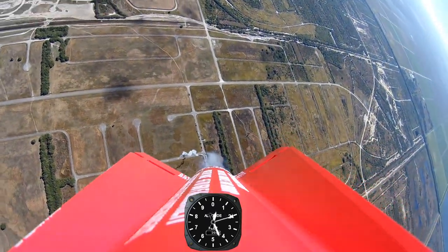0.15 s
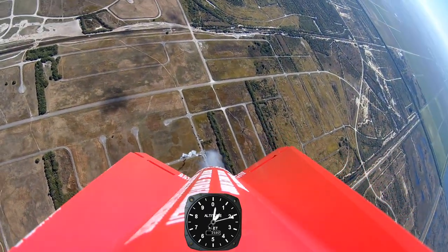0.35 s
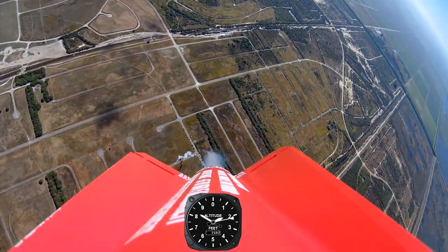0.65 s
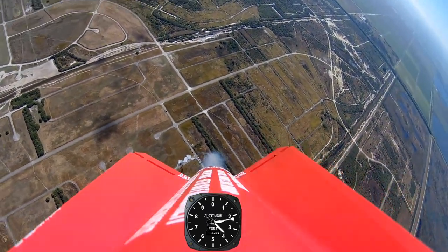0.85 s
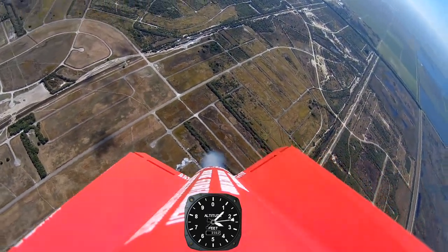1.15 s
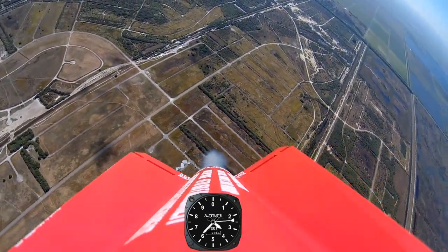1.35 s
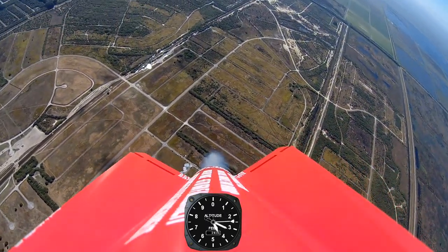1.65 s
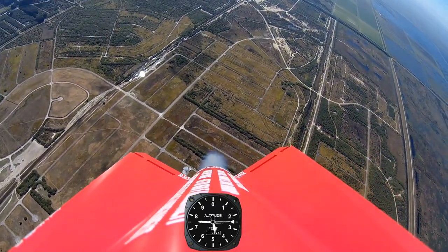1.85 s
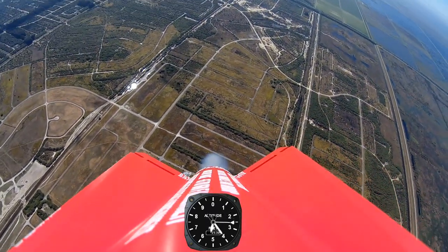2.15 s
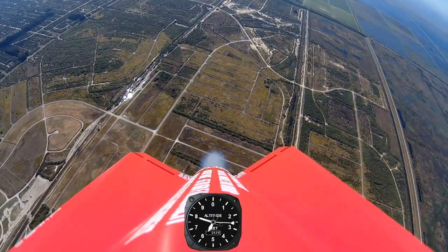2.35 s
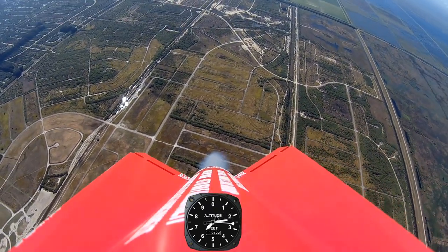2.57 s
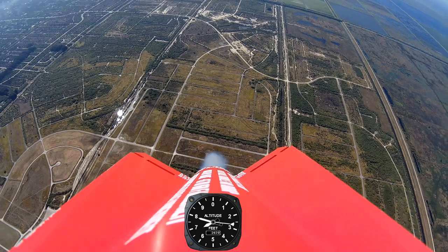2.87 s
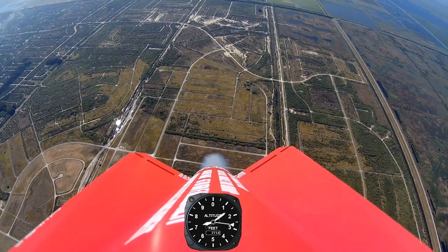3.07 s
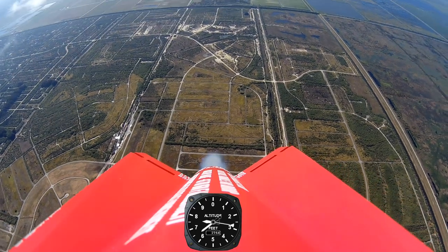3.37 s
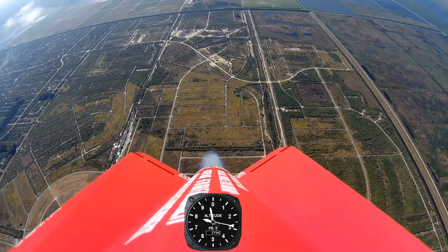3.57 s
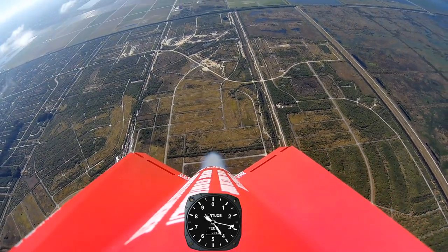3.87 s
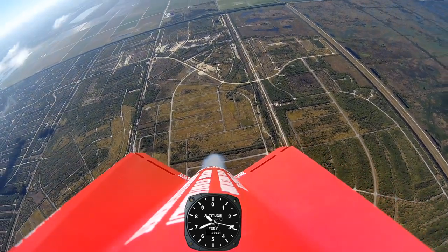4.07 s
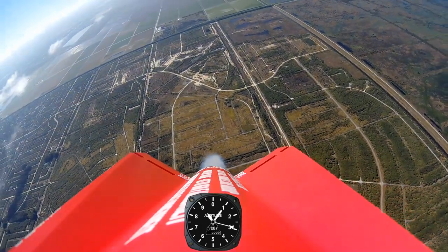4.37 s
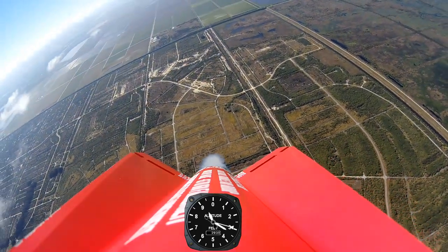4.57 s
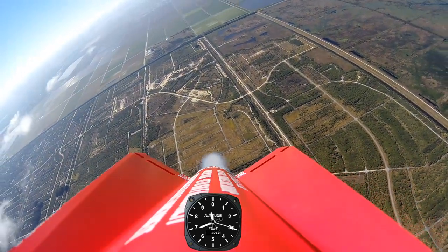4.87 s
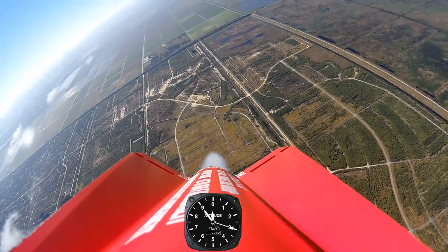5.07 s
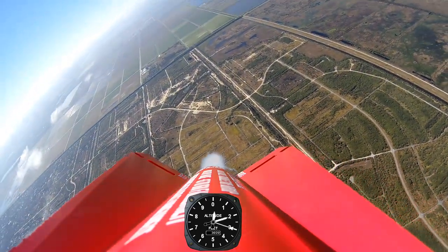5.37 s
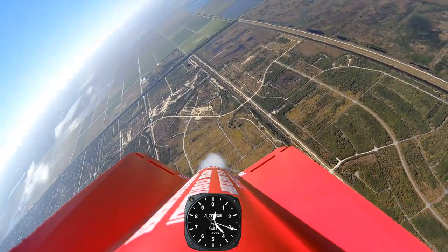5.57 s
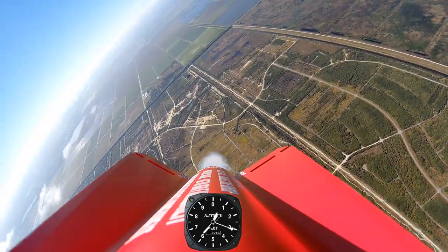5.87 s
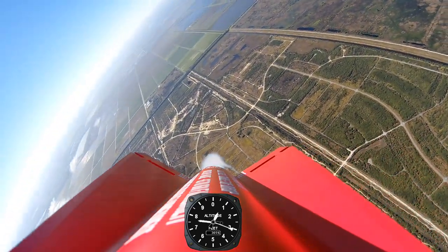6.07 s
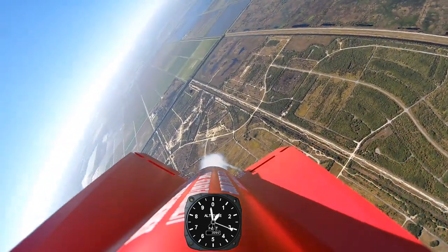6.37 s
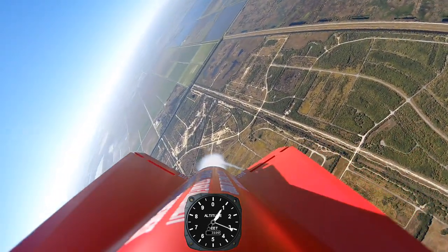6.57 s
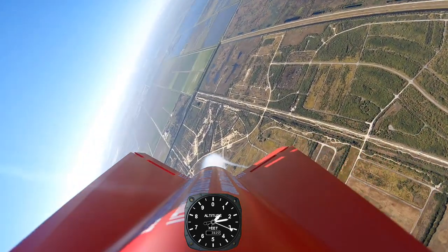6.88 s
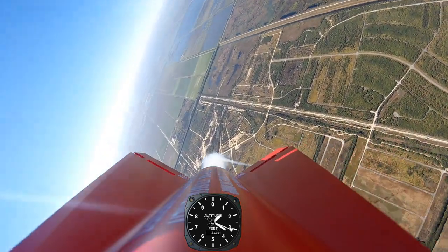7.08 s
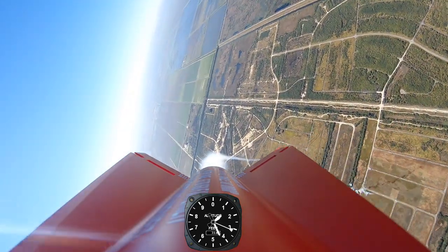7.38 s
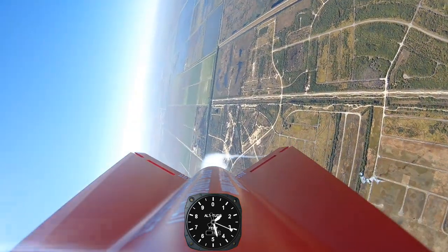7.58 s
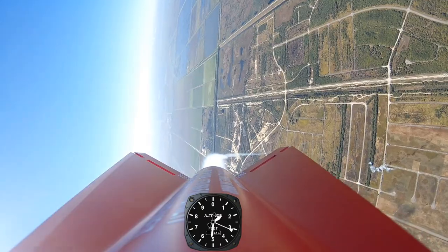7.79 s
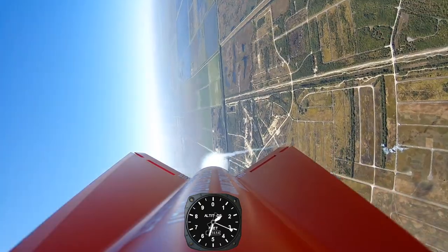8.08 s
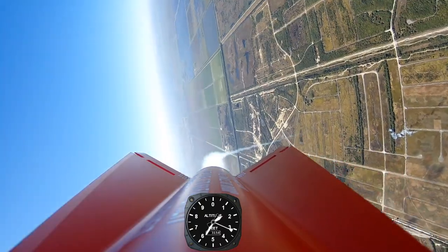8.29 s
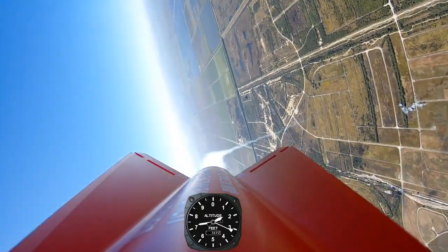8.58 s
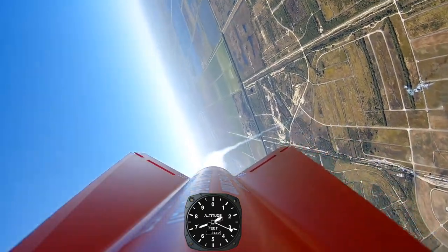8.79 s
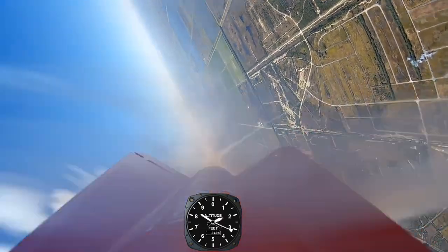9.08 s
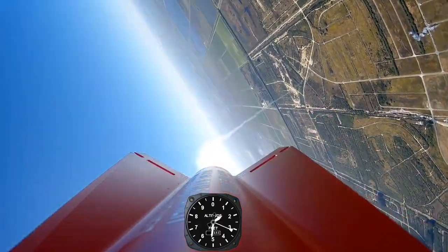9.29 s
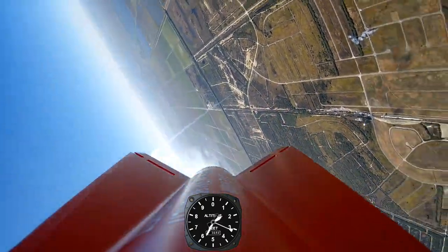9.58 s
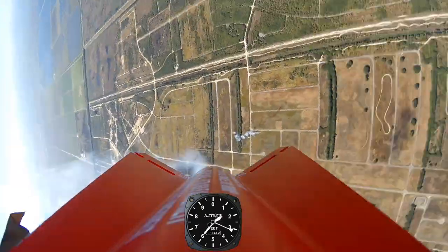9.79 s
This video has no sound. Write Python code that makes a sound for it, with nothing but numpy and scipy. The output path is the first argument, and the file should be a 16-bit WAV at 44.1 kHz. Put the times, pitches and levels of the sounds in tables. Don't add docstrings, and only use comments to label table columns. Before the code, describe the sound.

Distorted rocket roar and slipstream build until burnout, crackle away, leave a quieter wind hiss, then loose parts clatter on the airframe.

```python
import sys
import numpy as np
from scipy import signal
from scipy.fft import rfft, irfft, next_fast_len
from scipy.io import wavfile
from scipy.ndimage import uniform_filter1d, map_coordinates

SR = 44100
rng = np.random.default_rng(int(sys.argv[2]) if len(sys.argv) > 2 else 0)


def digitize_waveform(pressure):
    field = np.atleast_2d(pressure).T
    bounded = np.clip(field, -1, 1)
    quanta = np.round(bounded * 32767).astype(np.int16)
    wavfile.write(sys.argv[1], SR, quanta)


def rack_gain(trim_db):
    fader = np.asarray(trim_db, float)
    return 10 ** (fader / 20)


N = 438354
TIME_S = np.arange(N) / SR


def unit(x):
    return x / np.sqrt(np.mean(x ** 2) + 1e-20)


def curve(rows):
    return np.interp(TIME_S, *np.transpose(rows))


def wobble(rate_hz):
    return map_coordinates(rng.standard_normal(N // 100), [TIME_S * rate_hz])


def filtered(x, response):
    size = next_fast_len(N + 8192)
    hz = np.fft.rfftfreq(size, 1 / SR)
    return irfft(rfft(x, size) * response(hz), size)[:N]


def rush(spectrum, patchy_db=0):
    noise = rng.standard_normal(N + 512)
    if patchy_db:
        cells = signal.stft(noise.astype(np.float32), nperseg=512)[2]
        field = uniform_filter1d(rng.standard_normal(cells.shape), size=6, axis=0)
        field = uniform_filter1d(field, size=10, axis=1)
        noise = signal.istft(cells * rack_gain(patchy_db * unit(field)), nperseg=512)[1]
    knot_hz, db = np.transpose(spectrum)
    return unit(filtered(noise[:N], lambda hz: rack_gain(np.interp(np.log(hz + 1), np.log(knot_hz), db))))


def humps(s, length_s, size):
    reach = int(np.max(length_s) * SR)
    lag = np.arange(-reach, reach)
    shape = size[:, None] * np.exp(-2 * (lag / SR / length_s[:, None] * 2) ** 2)
    index = np.round(s * SR).astype(int)[:, None] + lag + reach
    return np.bincount(index.ravel(), shape.ravel(), N + 2 * reach)[reach:reach + N]


def blend(first, second, start_s, end_s):
    turn = np.interp(TIME_S, [start_s, end_s], [0, np.pi / 2])
    return np.cos(turn) * first + np.sin(turn) * second


def flattened(x):
    return unit(x / np.sqrt(np.abs(uniform_filter1d(x ** 2, size=130)) + .15))


# time_s, flow_db
AIRFLOW = [
    (0, 0.5),
    (.5, -0.3),
    (1.5, -1.5),
    (2.5, -4),
    (4.5, -11.5),
    (5.5, -13),
    (7, -18.5),
    (9.03, -21.5),
]
# time_s, gain_db
DUCKING = [
    (9.04, 0.5),
    (9.2, -1.5),
    (9.27, -3),
    (9.41, -7),
    (9.49, -1),
    (9.56, 2.5),
    (9.82, 4.5),
    (9.87, -11),
]
# centre_s, length_ms, body_swell_db, hiss_change_db
GUSTS = [(9.11, 50, 2.5, -2), (9.25, 60, 4, -1), (9.435, 21, 4.5, -8), (9.47, 23, -2.5, 2),
         (9.498, 16, 7, -9), (9.525, 25, -2.5, -1), (9.405, 12, 3, -6), (9.65, 30, -5, -3.5),
         (9.674, 8, -2, -15), (9.78, 64, -3.5, -5.5), (9.845, 50, 3, -2), (9.94, 26, 2, -10)]
# frequency_hz, density_db
BODY = [(20, -58.5), (40, -53.5), (70, -34.5), (114, -20.5), (146, -16), (262, -7), (431, -2.5),
        (664, -2.5), (863, -3), (1600, -13), (2080, -41), (3520, -120)]
HOLLOW = [(20, -58), (60, -47), (129, -21), (194, -15), (291, -7), (570, -2.5), (1020, -10), (1600, -22),
          (2080, -43), (3520, -120)]
FAST_HISS = [(700, -34), (1200, -13), (1700, -2), (2560, -3.5), (3550, -6.5), (4900, -10.5), (5500, -14),
             (6500, -28), (6950, -37), (7100, -91)]
HISS = [(700, -47.5), (1200, -12), (1700, -0.5), (2560, -1.5), (3550, -12), (5150, -17), (5900, -27),
        (6500, -35), (6950, -51), (7100, -85)]
TOP = [(6100, -30), (6500, 5), (6850, -4), (7600, -0.5), (8300, -4), (9000, -2), (10500, -6), (12000, -8),
       (13000, -16.5), (13600, -27), (14000, -57.5)]
SLOW_TOP = [(6100, -31), (6500, 3.5), (6850, 2.5), (7700, -0.5), (8000, -6.5), (8170, -17), (8350, -3.5),
            (9000, 0.5), (10500, -7), (12000, -5.5), (13000, -16), (13600, -28), (14000, -61)]


def slipstream():
    flow_db, duck_db = curve(AIRFLOW), curve(DUCKING)
    s, length_ms, swell_db, change_db = np.transpose(GUSTS)
    nose_drop = np.clip((TIME_S - 9.06) / .04 + .5, 0, 1)
    side_db = 5 * nose_drop + humps(s, length_ms / 500, swell_db)
    lull_db = humps(s, length_ms / 500, change_db)

    body_db = -14 + 0.6 * np.minimum(flow_db + 10, 0) + side_db
    hiss_knee_db = -6.5
    hiss_db = -26 + 0.72 * np.minimum(flow_db - hiss_knee_db, 0) + 0.51 * duck_db + lull_db
    hiss_db -= 0.23 * np.maximum(flow_db - hiss_knee_db, 0)
    top_db = -49 + flow_db + duck_db + .4 * lull_db

    gust_db = 0.38 * wobble(7) + 0.41 * wobble(30)
    burn_db = np.interp(TIME_S, [4.7, 5.1], [-3, 0])
    body = blend(rush(BODY, patchy_db=0.22), rush(HOLLOW, patchy_db=2.0), 9.05, 9.1)
    hiss = blend(rush(FAST_HISS), rush(HISS), 1.0, 4.7)
    top = blend(rush(TOP), rush(SLOW_TOP), 3.6, 5.4)
    wind = rack_gain(body_db + burn_db + gust_db + 0.83 * wobble(60)) * body
    wind += rack_gain(hiss_db + 6.5 + gust_db) * hiss
    return wind + rack_gain(top_db + .7 * gust_db) * top


# start_s, length_ms, clatter_db, panel_pitch_hz, panel_ring_db
THUDS = [
    (9.056, 19, -16, 1100, -19),
    (9.082, 14, -19, 1940, -27),
    (9.312, 9, -24, 1150, -15),
    (9.92, 7.8, -11.5, 4650, -31),
]
# start_s, length_ms, clatter_db, panel_pitch_hz, panel_ring_db
KNOCKS = [
    (9.295, 24, -13, 3020, -16.5),
    (9.354, 16, -15.5, 1950, -23),
    (9.371, 18, -21, 1920, -13),
    (9.428, 8, -33, 1950, -32),
    (9.72, 7, -19, 3200, -15),
    (9.934, 8, -14.5, 3080, -16.5),
]
# frequency_hz, density_db
CLATTER = [(300, -1.5), (1000, -7.5), (2000, 0.5), (3000, 0), (4000, -10), (5500, -21.5), (6500, -36),
           (7100, -74), (7400, -40), (10000, -43.5), (12500, -55), (14000, -95)]


def knocks():
    noise = unit(flattened(rush(CLATTER)) * rack_gain(3 * wobble(450)))
    treble = filtered(noise, lambda hz: 1 / (1 + (3500 / (hz + 1)) ** 4))
    noise, treble = np.pad(noise, (0, SR)), np.pad(treble, (0, SR))
    out = np.zeros(N + SR)
    t = np.arange(SR // 5) / SR
    # treble lift at the edge of the blow, dB
    blows = [(*row, -7) for row in THUDS] + [(*row, 4) for row in KNOCKS]
    for s, length_ms, db, pitch_hz, ring_db, lift_db in blows:
        start = round(s * SR)
        now = slice(start, start + len(t))
        after_s = np.maximum(t - length_ms / 1000, 0)
        fading_lift = rack_gain(lift_db - 330 * t) - 1
        burst = rack_gain(db - 60 * after_s / 0.016 - 60 * t) * (noise[now] + fading_lift * treble[now])
        t60_s = 5.0 * length_ms / 1000
        ring = rack_gain(ring_db + 2.5 - 60 * t / t60_s) * np.sin(2 * np.pi * (pitch_hz * t + rng.random()))
        attack = 1 - np.exp(-t / 0.00064)
        out[now] += attack * (burst + ring)
    return out[:N]


def sputter(count=22):
    start_s, end_s = 4.88, 5.4
    draw = rng.random((count, 4))
    s = start_s + (end_s - start_s) * ((np.arange(count) + draw[:, 0]) / count) ** 1.3
    swing = 2 * draw[:, 1:] - 1
    length_ms = 4.5 * rack_gain(4 * swing[:, 0])
    thump_db = -18.5 + 6 * swing[:, 1]
    rasp_db = 1.5 + 4 * swing[:, 2]
    return np.c_[s, length_ms, thump_db, rasp_db]


# time_s, roar_db
THRUST = [
    (0, -20.5),
    (1.2, -20.5),
    (2.4, -19.5),
    (2.9, -18.5),
    (4, -16.5),
    (4.93, -16.5),
]
# centre_s, length_ms, thump_db, rasp_over_thump_db
SURGES = [
    (.115, 16, -7, -5.5),
    (.331, 11, -5, -5),
    (.564, 16, -8, -5),
    (.845, 8, -9, -5),
    (4.617, 6, -7.5, -3),
]
POPS = [(4.9433, 4.2, -17, -1), (4.9700, 5, -15, 1), (4.986, 4, -9, -2.5), (5.04, 5, -11, -4),
        (5.0626, 5, -14.5, 4), (5.079, 3.5, -18, 7), (5.087, 5.5, -15, -4), (5.127, 6, -17, 5),
        (5.1546, 5.2, -13.5, 2), (5.1957, 8.6, -10, -3.5), (5.22, 6.9, -17, 1), (5.2367, 5.3, -19, -1.5),
        (5.279, 7, -15, 6.5), (5.305, 4.5, -16.5, 5), (5.327, 8.5, -10, -3), (5.3528, 4.5, -15.5, 6),
        (5.411, 5.1, -16, 3), (5.42, 4.5, -9, -11), (5.458, 6.9, -16, 7), (5.470, 5.9, -15, 6),
        (5.6657, 7.5, -25.5, 6), (5.7377, 2.7, -12, -10), (5.8016, 5, -18, 1), (5.8318, 4, -12.5, -3),
        (5.862, 6, -19, -7), (5.8784, 4, -12, -5), (5.9266, 7.1, -17.5, -0.5), (5.973, 5, -15.5, 5),
        (6.1582, 1.8, -15, 2), (6.2624, 4.1, -29, 10.5)]
JOLTS = [(9.0607, 2.8, -8.5, 3), (9.0824, 4.5, -10, -1.5), (9.0986, 2.9, -11.5, -2),
         (9.2942, 3.5, -19, -10), (9.3065, 4.9, -12, 5), (9.337, 4.5, -17, -11), (9.358, 8, -14, 1),
         (9.366, 3.5, -9.5, -10), (9.375, 3.5, -8, 1), (9.3956, 9, -16, -12), (9.43, 6.5, -17, -7),
         (9.494, 9, -17, -1), (9.68, 5, -20, -1), (9.7234, 8.4, -13.5, 0), (9.825, 12, -16, -6),
         (9.859, 5.9, -17, -1), (9.8916, 12, -23.5, 2), (9.9282, 4.5, -11, 1)]
# frequency_hz, density_db
ROAR = [(100, -15.5), (250, -4), (600, -3.5), (1200, -0.5), (2000, -6), (2750, -9), (3500, -19),
        (5500, -34), (6500, -45), (7100, -83)]
RASP = [(100, -19), (250, -1), (600, -2), (1200, -2.5), (1800, -9), (2500, -19.5), (5500, -45),
        (7100, -92.5)]


def overload():
    burnout_s = THRUST[-1][0]
    draw = rng.random((2400, 4))
    s = draw[:, 0] * burnout_s
    size = rack_gain(-9 * draw[:, 1])
    kicks = humps(s, .0011 * rack_gain(6 * draw[:, 2]), size * np.sign(draw[:, 3] - .5))
    burning = np.clip((burnout_s - TIME_S) / 0.13, 0, 1)
    kicks *= rack_gain(-19.5 + 2.5) / np.std(kicks[burning > 0])
    gate = humps(s, np.full(len(s), 0.0049), size) + 1.4 * burning
    gate *= rack_gain(curve(THRUST) + 3.0) / np.sqrt(np.mean(gate[burning > 0] ** 2))

    s, length_ms, db, rasp_db = np.r_[SURGES, POPS, JOLTS, sputter()].T
    sign = np.sign(rng.random(len(s)) - .5)
    kicks += humps(s, np.full(len(s), 0.0015), rack_gain(db + 7.5) * sign)
    bursts = humps(s + 0.0029, 1.34 * length_ms / 1000, rack_gain(db + rasp_db + 4))
    return kicks + gate * rush(ROAR) + bursts * flattened(rush(RASP))


def scene():
    return (slipstream() + knocks() + overload())[None]


def preamplifier(x):
    splatter = x / (1 + np.abs(x / .74) ** 6) ** (1 / 6) - x
    return x + filtered(splatter, lambda hz: 1 / (1 + (hz / 4500) ** 16))


# centre_hz, width_hz, depth (0-1)
NOTCHES = [
    (761, 30, .85),
    (7080, 280, .95),
    (12680, 200, .7),
]


def microphone_dips(x):
    def response(hz):
        dips = [1 - np.clip(depth, 0, 1) / (1 + (2 * (hz - centre_hz) / width_hz) ** 2)
                for centre_hz, width_hz, depth in NOTCHES]
        return np.prod(dips, axis=0)
    return filtered(x, response)


# time_s, highest_surviving_line_hz
STARVED = [(.122, 2200), (.335, 3300), (.570, 2600), (.847, 2800), (.997, 2050), (1.018, 1850),
           (1.146, 3700), (1.999, 3100), (2.255, 4750), (2.362, 4100), (3.237, 2750), (3.279, 2800),
           (4.111, 3500), (4.623, 3000), (5.178, 2700), (5.519, 2700), (5.924, 2950), (5.946, 2950),
           (6.863, 2800), (7.204, 2800), (7.311, 2600), (7.802, 3100), (8.058, 2750), (8.719, 3300),
           (8.804, 2850), (8.826, 2850), (8.869, 2750), (8.975, 2600), (9.871, 1800)]
# frequency_hz, step_db
STARVED_STEP = [(0, 15.5), (500, 16.5), (1100, 18.5), (2000, 13), (3000, 10.5), (4700, 10)]
# time_s, step_change_db
COARSER = [
    (0, 3),
    (2.4, 3.5),
    (3.2, 1.5),
    (4.6, 0),
    (5.3, 0),
    (5.9, 1.5),
    (9.9, 1),
]


def starve(x):
    hop_s, first_s = 1024 / 48000, .12184
    half = round(hop_s * SR)
    n, k = np.arange(2 * half)[:, None], np.arange(half)
    line_hz = k / (2 * hop_s)
    window = np.sin(np.pi * (n + .5) / (2 * half))
    basis = window * np.cos(np.pi / half * (n + .5 + half / 2) * (k + .5)) * np.sqrt(2 / half)
    step_gain = rack_gain(np.interp(line_hz, *np.transpose(STARVED_STEP)))
    out = x.copy()
    for s, top_hz in STARVED:
        frame_s = first_s + round((s - first_s) / hop_s) * hop_s
        start = round(frame_s * SR) - half
        lines = x[start:start + 2 * half] @ basis
        step = step_gain * np.std(lines) * rack_gain(np.interp(s, *np.transpose(COARSER)))
        kept = step * np.round(lines / step) * (line_hz < top_hz)
        last = int(top_hz * 2 * hop_s) - 1
        kept[last] = step[last] * np.sign(lines[last])
        out[start:start + 2 * half] += basis @ (kept - lines)
    return out


def top_cut(x):
    return signal.sosfilt(signal.butter(12, 13800, fs=SR, output="sos"), x)


def record(dry):
    x = preamplifier(dry[0])
    x = microphone_dips(x)
    mix = starve(x)[None]
    return top_cut(mix)


dry = scene()
out = record(dry)
digitize_waveform(out)
```